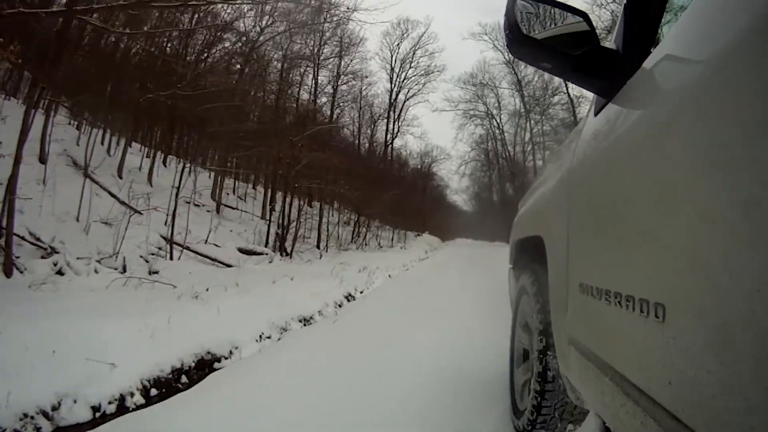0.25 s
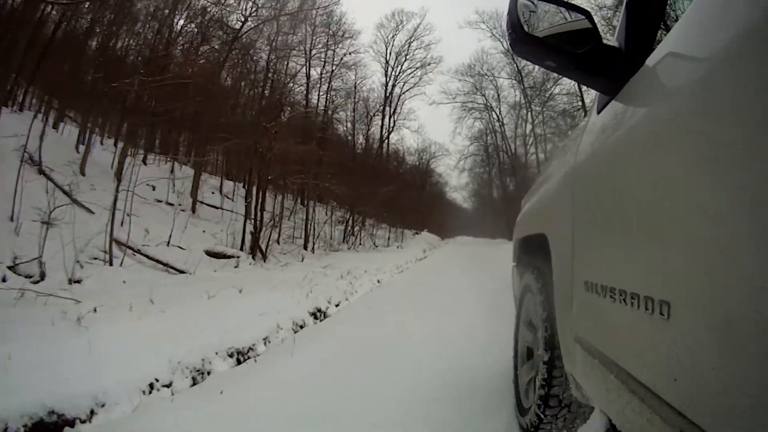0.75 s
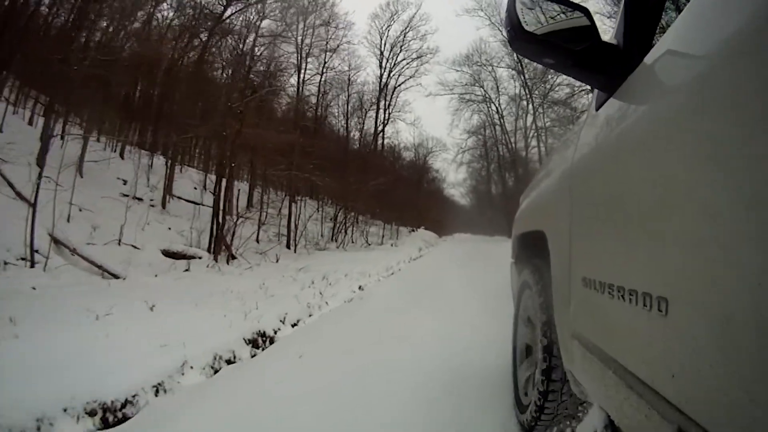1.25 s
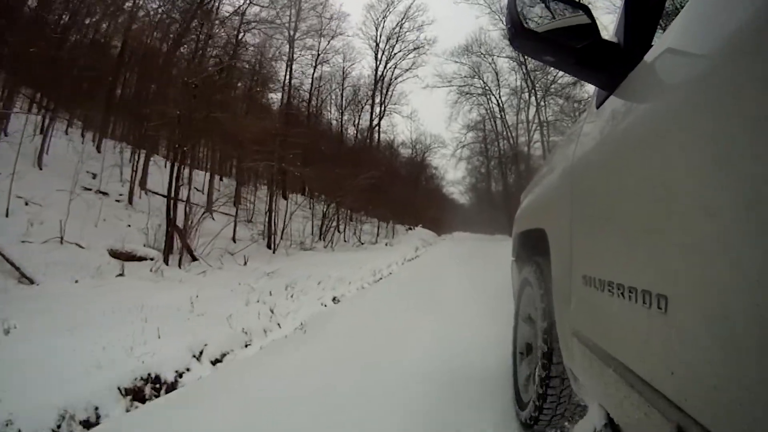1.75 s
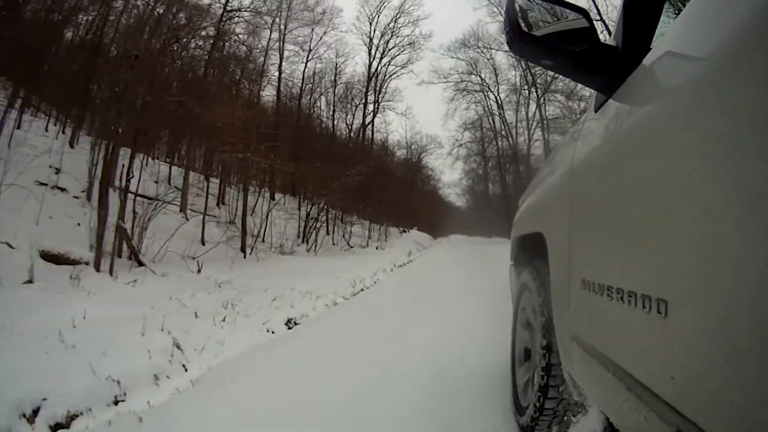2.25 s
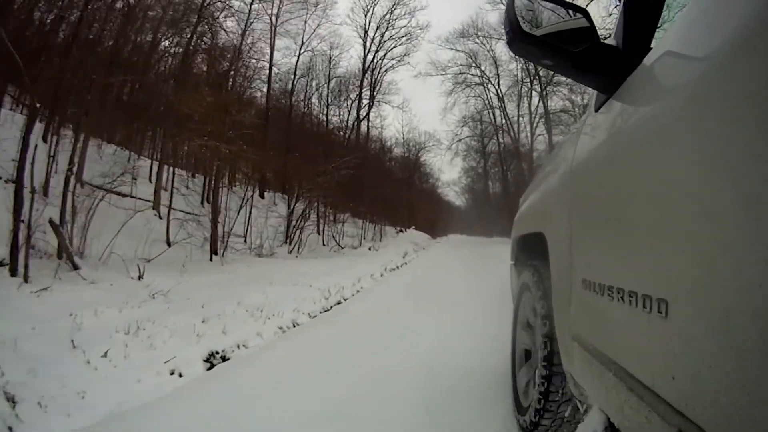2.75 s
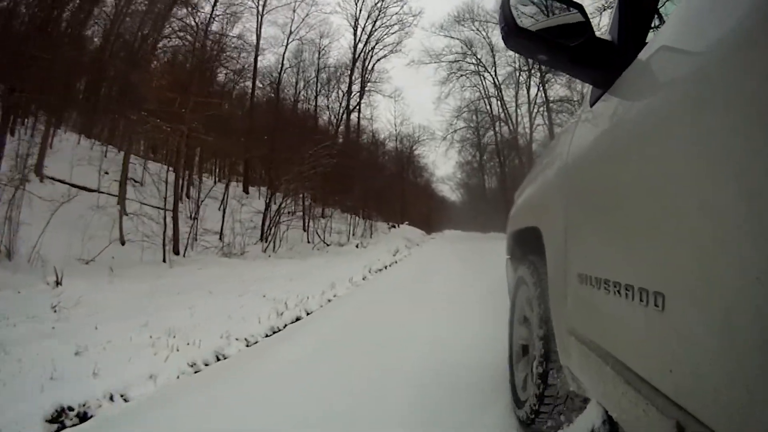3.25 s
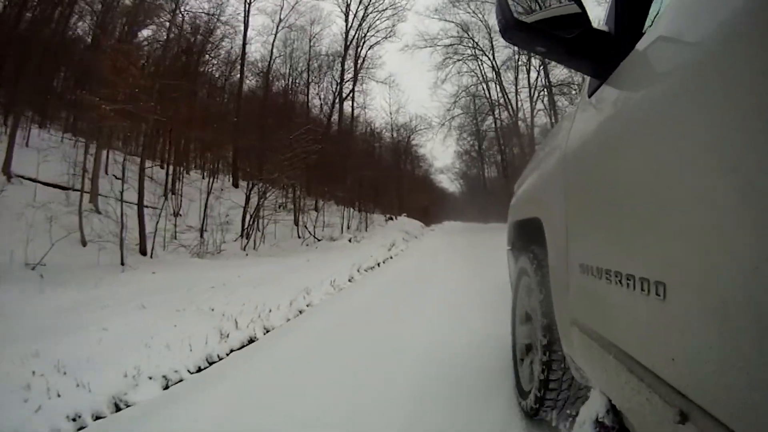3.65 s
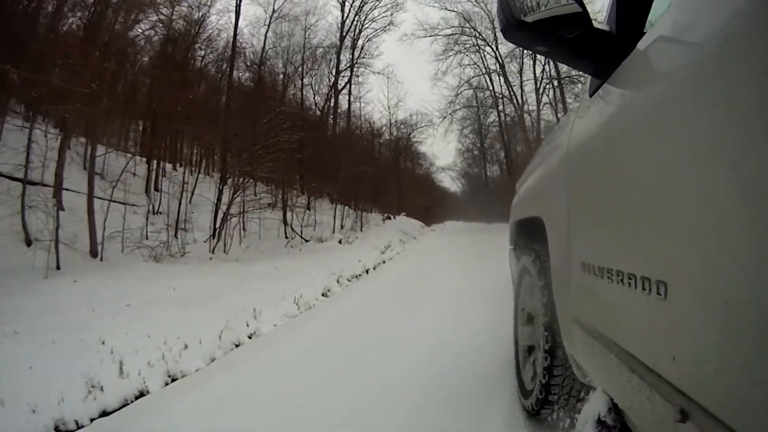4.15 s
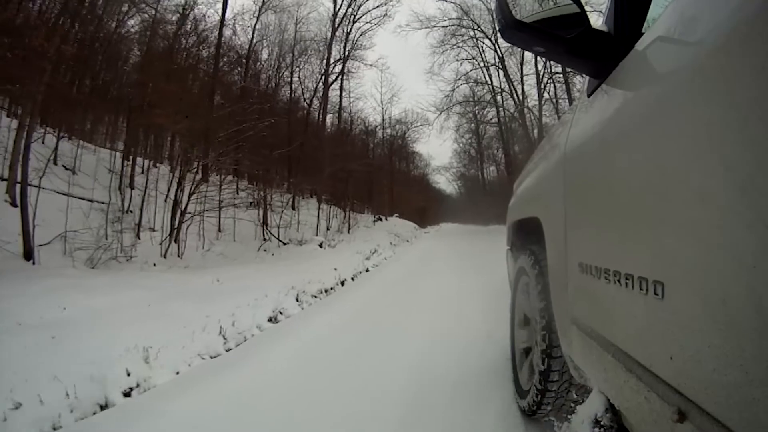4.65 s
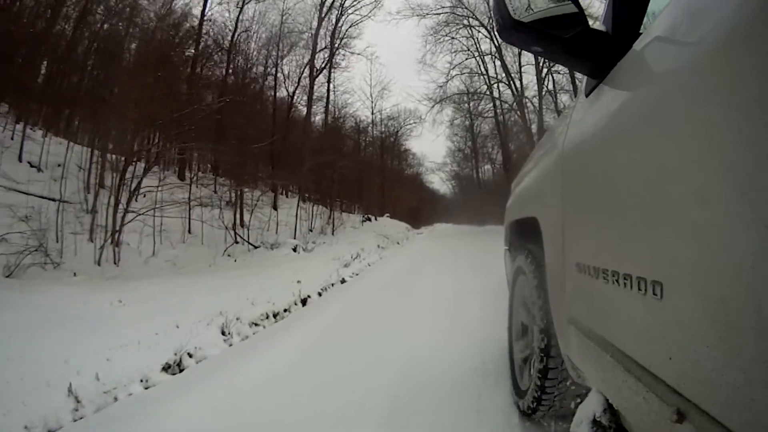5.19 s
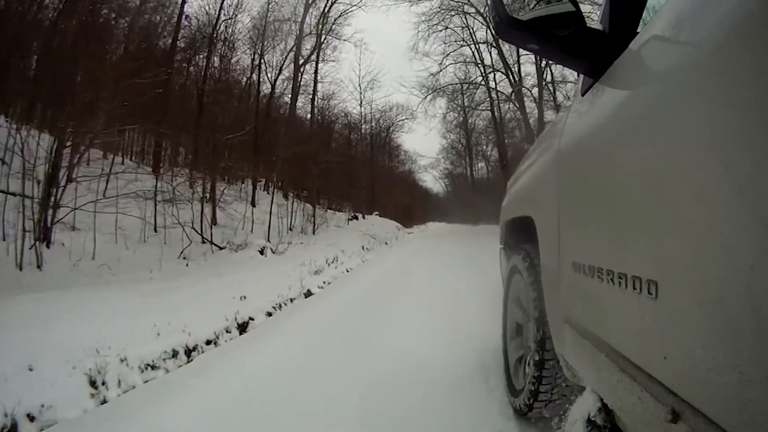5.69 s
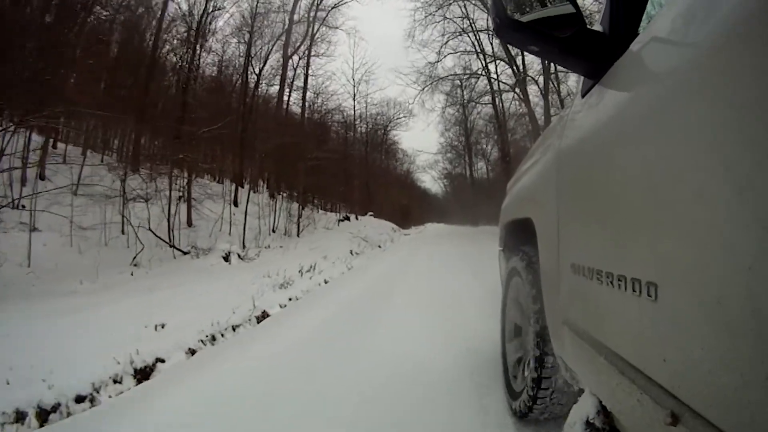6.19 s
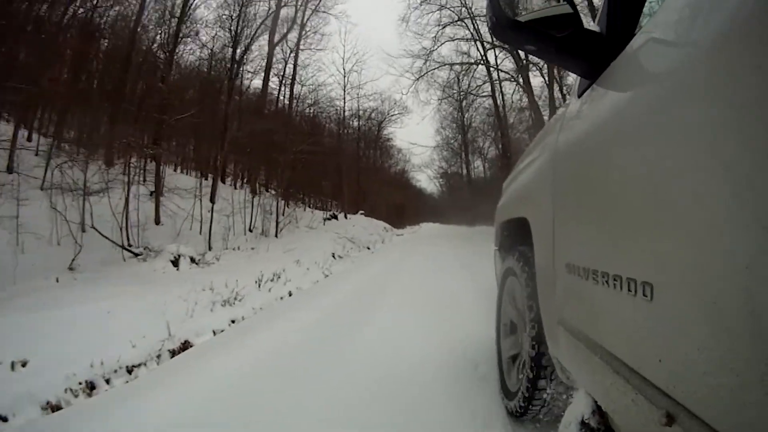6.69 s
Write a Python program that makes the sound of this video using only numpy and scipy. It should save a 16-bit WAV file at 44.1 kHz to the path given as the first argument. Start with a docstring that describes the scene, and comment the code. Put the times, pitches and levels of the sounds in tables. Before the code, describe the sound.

A pickup truck rolls at a steady pace over packed snow on a forest road, heard close beside the door, behind the front wheel. From start to finish, deep wind rumbles on the microphone with soft, irregular thuds, frequent in the first two seconds or so. Under it the tyre keeps up an even roar with a low boom, a faint hum and a fine crunch of snow. A thin sizzle lies over the rumble.

From about 2.5 to 3.8 seconds the tread breaks through icy crust with a faint, coarser crackle. From around 5.8 seconds a gust builds, adding a brighter rush and a rapid run of heavier thumps, loudest from 6.5 seconds to the end near 7 seconds. At about 6.7 and 6.8 seconds, two short, light sprays of snow patter against the door.

```python
"""Pickup truck on packed snow.

Heard beside the door, behind the front wheel, at a steady pace on a forest road. The tread crushes
snow, and the wheel well rings with it; halfway it breaks icy crust. Wind rumbles and thuds on the
microphone; near the end a gust buffets it and snow sprays the door. A slow sample-and-hold
converter lays a thin sizzle over the rumble."""
import sys
import numpy as np
from scipy import signal
from scipy.fft import rfft, irfft, next_fast_len
from scipy.io import wavfile
from scipy.ndimage import uniform_filter1d

SR = 44100
rng = np.random.default_rng(int(sys.argv[2]) if len(sys.argv) > 2 else 0)


def to_wav(sig):
    """Store sig (one row per channel, or 1-D mono) as 16-bit WAV at the path in sys.argv[1].

    Samples outside -1..1 are clipped; the rate is SR.
    """
    pcm = np.clip(np.atleast_2d(sig), -1, 1) * 32767
    pcm = np.round(pcm).astype(np.int16)
    wavfile.write(sys.argv[1], SR, pcm.T)  # frames by channels


N = 305613
TIME = np.arange(N) / SR


def from_db(db):
    """Decibels to gain."""
    return 10 ** (np.asarray(db) / 20)


def rms_one(x):
    """Scale to unit power."""
    return x / np.sqrt(np.mean(x ** 2) + 1e-20)


def evened(x, over_s):
    """Keep quick lumps but hold the slow level at rms 1."""
    return x / np.sqrt(uniform_filter1d(x ** 2, max(int(over_s * SR), 1)) + 1e-12)


def in_time(curve):
    """A curve's value at every sample."""
    return np.interp(TIME, *np.transpose(curve))


def drift(rate_hz):
    """Smooth random motion, mostly below rate_hz; rms 1."""
    size = next_fast_len(N)
    hz = np.fft.rfftfreq(size, 1 / SR)
    return rms_one(irfft(rfft(rng.standard_normal(size)) / (1 + (hz / rate_hz) ** 2), size)[:N])


def coloured(x, spectrum, resonances=()):
    """Apply a spectrum, falling 18 dB/octave past its last point, and resonances; rms 1."""
    size = next_fast_len(N)
    hz = np.maximum(np.fft.rfftfreq(size, 1 / SR), 1)
    points_hz, points_db = np.transpose(spectrum)
    shape_db = np.interp(np.log(hz), np.log(points_hz), points_db)
    shape_db -= 18 * np.log2(np.maximum(hz / points_hz[-1], 1))
    for centre_hz, width_hz, lift_db in resonances:
        shape_db += lift_db / (1 + (2 * (hz - centre_hz) / width_hz) ** 2)
    return rms_one(irfft(rfft(x, size) * from_db(shape_db), size)[:N])


def wavering_tone(centre_hz, width_hz):
    """A tone whose strength and phase wander in a narrow band; rms 1."""
    phase = 2 * np.pi * np.cumsum(centre_hz * np.ones(N)) / SR
    return rms_one(drift(width_hz) * np.cos(phase) + drift(width_hz) * np.sin(phase))


def impulses(per_s, spread_db):
    """Clicks of random time, sign and size."""
    clicks = (rng.random(N) < per_s / SR) * rng.choice([-1, 1], N)
    return clicks * from_db(spread_db * np.minimum(rng.exponential(1, N), 4))


def bass_cut(x, corner_hz, q):
    """The microphone's resonant high-pass: a push is followed by a swing back."""
    w = 2 * np.pi * corner_hz
    return signal.lfilter(*signal.bilinear([1, 0, 0], [1, w / q, w * w], SR), x)


def wind(swell_db, rumble_gain, lumps_db, lumps_hz):
    """Lumpy turbulence: a deep sway, a buffeting rumble and, in the gust, a brighter rush."""
    # Spectra of the three. Each row: frequency in Hz, relative density in dB.
    sway_spectrum = [(8, -19), (18, -10.5), (27, 2), (37, 7), (60, 9.5), (85, -9.5), (160, -44)]
    buffet_spectrum = [(35, -38), (65, -4), (105, -2.5), (160, -4), (230, -4), (300, -16), (420, -19.5),
                       (700, -32), (1500, -56), (4000, -71)]
    rush_spectrum = [(70, -6.5), (150, 9.5), (230, -2), (320, -2), (400, 3), (600, -4), (780, -6.5),
                     (980, -9), (1250, -14.5), (1500, -17), (1900, -27.5), (3000, -35), (5500, -51)]
    # Air tearing along the door. Each row: time in seconds, level in dB.
    gust_levels = [(0, -74), (5.3, -56), (5.85, -45), (6.1, -45.5), (6.28, -41), (6.4, -41.5),
                   (6.53, -36.5), (6.7, -35.5), (6.82, -34.5), (6.93, -35.5)]
    # Faint whistles in the door gaps. Each row: centre in Hz, width in Hz, lift in dB.
    door_gaps = [(600, 90, 2), (910, 130, 3.5), (1070, 70, 2), (1500, 90, 4)]
    lumps = from_db(lumps_db * drift(lumps_hz))
    drive, ceiling = from_db(-29.5 + swell_db), from_db(-24)
    limited = drive / np.sqrt(1 + (drive / ceiling) ** 2)  # strong flow feeds single eddies instead
    buffet = evened(coloured(lumps * rng.standard_normal(N), buffet_spectrum), over_s=0.09)
    sway = from_db(-38.5 + 0.77 * swell_db) * coloured(rng.standard_normal(N), sway_spectrum)
    rush = coloured(lumps * rng.standard_normal(N), rush_spectrum, door_gaps)
    return limited * rumble_gain * buffet + sway + from_db(in_time(gust_levels)) * rush


def passing_eddies(swell_db, strays_per_s):
    """Rows of eddies: strong ones at set times, and strays that thicken as the airflow swells."""
    # Each row: time in seconds, peak suction in dB, half width in ms.
    strong_eddies = [(0.0889, -23, 2.9), (0.3517, -21.5, 1.9), (0.5161, -19.5, 1.64), (0.6607, -24, 1.9),
                     (0.7473, -22.5, 3.4), (0.8024, -20, 1.6), (0.8485, -22.5, 2.5), (0.9513, -19, 1.75),
                     (0.9778, -21, 3), (1.2412, -22.5, 2.6), (1.331, -17, 2.35), (1.357, -21.5, 2.6),
                     (1.4663, -20, 1.8), (1.5256, -20, 3.2), (1.559, -24.5, 3.7), (1.5954, -19.5, 3.2),
                     (1.6422, -19.5, 1.6), (1.686, -19, 1.7), (1.7667, -21, 1.3), (1.7837, -18.5, 2.4),
                     (1.9262, -18.5, 1.7), (2.0625, -20, 1.8), (2.2077, -23, 3.9), (2.3096, -19.5, 2.6),
                     (2.6748, -23.5, 1.7), (2.8224, -27, 2), (3.0995, -23, 2), (3.5601, -24.5, 2.8),
                     (4.032, -19, 1.6), (4.0465, -19.5, 2.4), (4.059, -23, 3.8), (4.0815, -21.5, 1.3),
                     (4.4646, -19, 2.2), (4.6083, -20.5, 2.1), (4.87, -19, 1.6), (4.905, -18, 2.5),
                     (5.235, -23.5, 3.6), (5.3399, -21, 2.1), (5.559, -21, 2), (5.982, -21, 2.7),
                     (6.0731, -11.5, 2.5), (6.088, -13.5, 2.5), (6.1859, -19, 2.8), (6.2408, -17, 1.5),
                     (6.269, -15.5, 2.95), (6.3608, -16.5, 2.4), (6.3935, -16, 2.6), (6.4533, -20, 2),
                     (6.4612, -15, 2.4), (6.4769, -12, 2.4), (6.4937, -14.5, 2.3), (6.5104, -14, 2.8),
                     (6.5197, -13.5, 1.5), (6.532, -11, 1.77), (6.5444, -12, 2.8), (6.5608, -17.5, 2.1),
                     (6.5755, -15.5, 1.6), (6.5971, -18, 2), (6.612, -10.5, 2.1), (6.6419, -16, 2.4),
                     (6.6633, -7.5, 1.96), (6.697, -9, 2.5), (6.7061, -25, 3), (6.7156, -16.5, 3.3),
                     (6.725, -11.5, 2.6), (6.7627, -12, 2.1), (6.772, -13.5, 2.2), (6.7824, -15, 2.1),
                     (6.8002, -16, 2.1), (6.8173, -20, 2.2), (6.8297, -9, 1.8), (6.8385, -17.5, 3.5),
                     (6.8656, -8, 1.46), (6.9097, -16, 1.2), (6.9193, -11, 2.3), (6.927, -17, 3.1)]
    born = np.flatnonzero(rng.random(N) < strays_per_s * from_db(swell_db) / SR)
    strength_db, size_db = -1.6 * rng.standard_normal((N, 2))[born].T
    peak_db = -23 + 0.22 * swell_db[born] + strength_db
    half_width_ms = 2.2 * from_db(size_db)
    return list(strong_eddies) + list(zip(TIME[born], peak_db, half_width_ms))


def clearing(eddies, depth, half_width_s):
    """Gain of the finer turbulence, swept aside while an eddy passes."""
    swept = np.zeros(N + 2 * SR)
    t = np.arange(-SR // 20, SR // 20) / SR
    for at_s, _, _ in eddies:
        start = SR + round(at_s * SR) - len(t) // 2
        swept[start:start + len(t)] += np.exp(-(t / half_width_s) ** 2)
    return 1 - np.clip(depth * swept[SR:SR + N], 0, 1)


def eddy_thuds(eddies, port_hz, port_q, rim_share):
    """Each eddy is a brief pressure dip inside a wider rim of raised pressure: a soft thud."""
    out = np.zeros(N + 2 * SR)
    t = np.arange(-SR // 20, SR // 20) / SR
    for at_s, peak_db, half_width_ms in eddies:
        radius = 1e3 * t / half_width_ms
        core = np.exp(1 - np.sqrt(1 + (2.1 * radius) ** 2))
        rim = rim_share * np.exp(-(radius / 1.95) ** 2)
        thud = bass_cut(rim - core, port_hz, port_q)
        start = SR + round(at_s * SR) - np.argmin(thud)
        out[start:start + len(t)] += from_db(peak_db) * thud / -thud.min()
    return out[SR:SR + N]


def running_gear():
    """Tread blocks hum as they meet the snow, the driveline whines faintly, the carcass booms."""
    # Each row: time in seconds, level in dB.
    hum_levels = [(0, -51), (1.8, -50), (2.3, -50), (2.8, -52.5), (3.4, -51.5), (4.3, -50.5), (5, -63),
                  (6.93, -50.5)]
    whine_levels = [(0, -75), (2.4, -69), (3.8, -67), (4.8, -77), (5.8, -76.5), (6.93, -71)]
    boom_levels = [(0, -39), (1.2, -39), (1.7, -35.5), (2.3, -38), (2.8, -36.5), (3.6, -37.5), (4.6, -35.5),
                   (5.3, -50), (5.9, -43), (6.93, -40)]
    tread_hz = 506 + 7 * drift(rate_hz=3)  # slight tread slip
    hum = evened(wavering_tone(tread_hz, width_hz=12), over_s=0.15)
    whine = wavering_tone(centre_hz=1320, width_hz=8)
    boom = evened(wavering_tone(centre_hz=96.9, width_hz=30), over_s=0.18)
    return (from_db(in_time(hum_levels)) * hum
            + from_db(in_time(whine_levels)) * whine
            + from_db(in_time(boom_levels)) * boom)


def spray(flakes_per_s, spread_db, attack_s, release_s):
    """Loose snow flung from the tyre patters on the door in short swells, coarse then fine."""
    # Each row: crest in seconds, level in dB, centre in Hz.
    swells = [(6.7, -52, 1450), (6.81, -53, 1990)]
    # Ring of the door. Each row: frequency in Hz, relative density in dB.
    door_spectrum = [(800, -3), (1500, -6), (2700, -8), (3500, -12), (5000, -28)]
    width_hz, lift_db = 490, 15
    out = 0
    for crest_s, level_db, centre_hz in swells:
        late_s = TIME - crest_s
        swell = np.exp(-(late_s / np.where(late_s < 0, attack_s, release_s)) ** 2)
        flakes = impulses(flakes_per_s, spread_db)
        patter = coloured(flakes, door_spectrum, [(centre_hz, width_hz, lift_db)])
        out += from_db(level_db) * swell * patter
    return out


def crust(cracks_per_s, spread_db):
    """The tread breaks through icy crust, which crackles more coarsely than snow."""
    # Each row: time in seconds, level in dB.
    crackle_levels = [(2.35, -85), (2.56, -60.5), (2.9, -60), (3.05, -64), (3.3, -58.5), (3.7, -60),
                      (4.0, -85)]
    # Each row: frequency in Hz, relative density in dB.
    crackle_spectrum = [(700, -19.5), (1200, -0.5), (1500, 0), (1900, -6.5), (2700, -15.5), (4000, -30.5)]
    cracks = impulses(cracks_per_s, spread_db)
    return from_db(in_time(crackle_levels)) * coloured(cracks, crackle_spectrum)


def tyre(grains_per_s, spread_db, lumps_db, lumps_hz):
    """The tyre roars, snow grains break and powder hisses; lumps in the track vary the load."""
    # Each row: time in seconds, level in dB.
    roar_levels = [(0, -41.5), (1.7, -41.5), (2.7, -41.5), (3.5, -41.5), (4.2, -41.5), (6.93, -42.5)]
    crunch_levels = [(0, -59), (2.4, -59.5), (3.3, -60), (4.15, -59.5), (4.6, -60), (6.0, -60), (6.88, -61)]
    # Each row: frequency in Hz, relative density in dB.
    roar_spectrum = [(80, 1.5), (250, -2), (450, -2.5), (600, -7.5), (950, -11), (1200, -16), (1450, -19),
                     (1650, -29.5), (2500, -38), (5000, -57.5)]
    crunch_spectrum = [(600, -7.5), (1300, -1.5), (1850, -5.5), (2300, -7), (3100, -13.5), (4000, -21),
                       (5500, -26)]
    powder_spectrum = [(1500, -11.5), (3000, -0.5), (4000, -0.5), (5500, 0.5)]
    # Tread and wheel well; wing and door. Each row: centre in Hz, width in Hz, lift in dB.
    well_resonances = [(190, 24, 2.5), (218.6, 17, 6.5), (243, 11, 5.5), (353, 27, 3), (447, 33, 5),
                       (491.7, 18, 6), (542.5, 12, 6.5), (679.6, 18, 6.5), (720.5, 24, 6.5), (749, 12, 5.5),
                       (867, 18, 3), (950, 29, 3), (1009, 14, 4), (1097, 20, 5), (1462, 45, 4),
                       (1693, 27, 6), (1722, 38, 11)]
    panel_resonances = [(1740, 40, 4), (1950, 64, 2.5), (2070, 60, 1.5), (2325, 80, 2.5), (2610, 110, 2.5)]
    ridge_at_s, ridge_length_s, ridge_db = 5, 0.026, 3  # a ridge briefly loads the tyre
    bump = from_db(ridge_db * np.exp(-(2 * (TIME - ridge_at_s) / ridge_length_s) ** 2))
    load = from_db(lumps_db * drift(lumps_hz))
    grains = impulses(grains_per_s * load, spread_db)
    crunch = from_db(in_time(crunch_levels)) * coloured(grains, crunch_spectrum, panel_resonances)
    rolling = coloured(load * rng.standard_normal(N), roar_spectrum, well_resonances)
    roar = from_db(in_time(roar_levels)) * bump * evened(rolling, over_s=0.2)
    powder = from_db(-72) * coloured(rng.standard_normal(N), powder_spectrum)
    return roar + crunch + powder


def scene():
    """Tyre and wind at one microphone."""
    # Airflow on the microphone. Each row: time in seconds, level in dB.
    airflow = [(0, -28.5), (0.28, -34), (0.38, -29.5), (0.44, -30.5), (0.53, -30.5), (0.62, -33.5),
               (0.7, -31.5), (0.87, -35), (0.97, -30), (1.06, -32.5), (1.3, -30.5), (1.42, -30.5),
               (1.52, -31.5), (1.7, -27.5), (1.85, -34.5), (1.94, -30), (2.02, -36.5), (2.08, -31.5),
               (2.26, -33.5), (2.31, -33), (2.38, -32), (2.44, -32.5), (2.68, -36), (2.85, -31),
               (2.91, -36), (3, -35.5), (3.12, -32.5), (3.17, -35), (3.23, -31.5), (3.35, -34), (3.43, -32),
               (3.53, -34), (3.58, -33.5), (3.8, -33.5), (3.98, -30.5), (4.05, -33), (4.2, -32), (4.4, -32),
               (4.48, -30), (4.8, -28.5), (4.9, -30), (5.07, -27.5), (5.16, -32.5), (5.23, -27.5),
               (5.42, -29), (5.85, -31), (6, -27), (6.14, -29), (6.42, -30), (6.48, -30.5), (6.93, -22.5)]
    cruise_db = -30
    swell_db = in_time(airflow) - cruise_db
    eddies = passing_eddies(swell_db, strays_per_s=2.2)  # rate at cruising airflow
    rolling = tyre(grains_per_s=12000, spread_db=3, lumps_db=0.9, lumps_hz=52)
    rumble_gain = clearing(eddies, depth=0.75, half_width_s=0.0055)
    air = wind(swell_db, rumble_gain, lumps_db=1.6, lumps_hz=73)
    thuds = eddy_thuds(eddies, port_hz=70.6, port_q=1.0, rim_share=0.71)
    gear = running_gear()
    snow = spray(flakes_per_s=7300, spread_db=7.5, attack_s=0.048, release_s=0.042)
    ice = crust(cracks_per_s=2500, spread_db=3)
    return (air + thuds + gear + snow + ice + rolling)[None]


def record(dry):
    """The converter holds each slow sample, mirroring the rumble around its rate; the top is cut."""
    converter_hz, hold_ticks = 12000, 4
    antialias_hz, cutoff_hz, fade_s = 5400, 15100, 0.002
    tick_hz = hold_ticks * converter_hz
    band_limited = signal.sosfilt(signal.butter(16, antialias_hz, fs=SR, output="sos"), dry)
    slow = signal.resample_poly(band_limited, tick_hz, SR, axis=-1)[:, ::hold_ticks]
    held = signal.resample_poly(np.repeat(slow, hold_ticks, axis=-1), SR, tick_hz, axis=-1)[:, :N]
    soft_ends = np.clip(np.minimum(TIME, TIME[-1] - TIME) / fade_s, 0, 1)
    return signal.sosfilt(signal.ellip(10, 0.1, 80, cutoff_hz, fs=SR, output="sos"), held * soft_ends)


dry = scene()
out = record(dry)
to_wav(out)
```